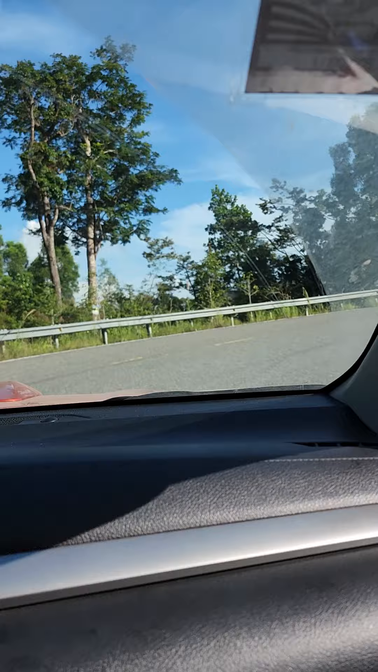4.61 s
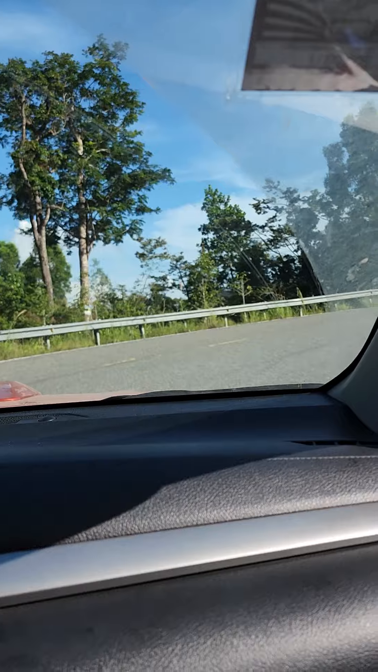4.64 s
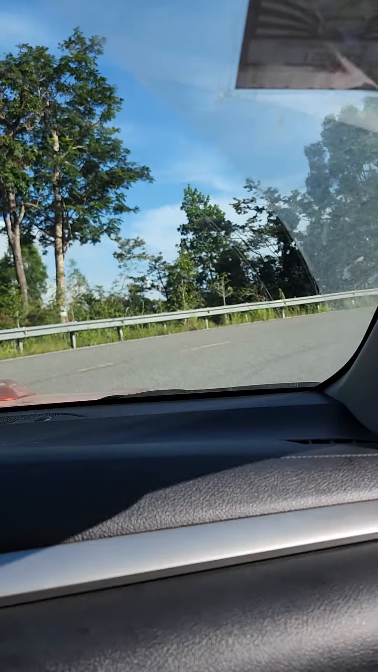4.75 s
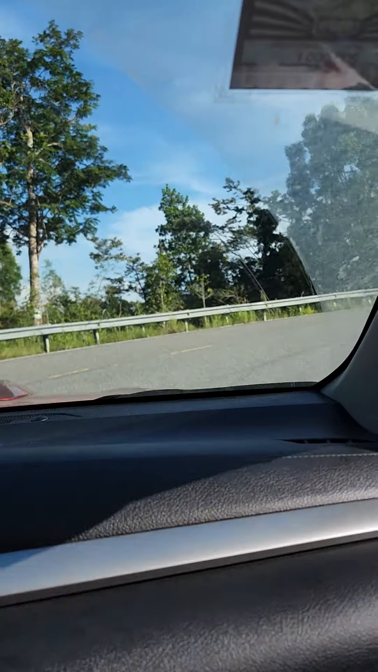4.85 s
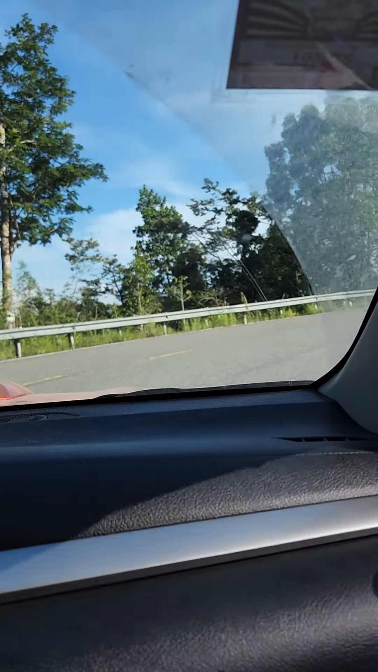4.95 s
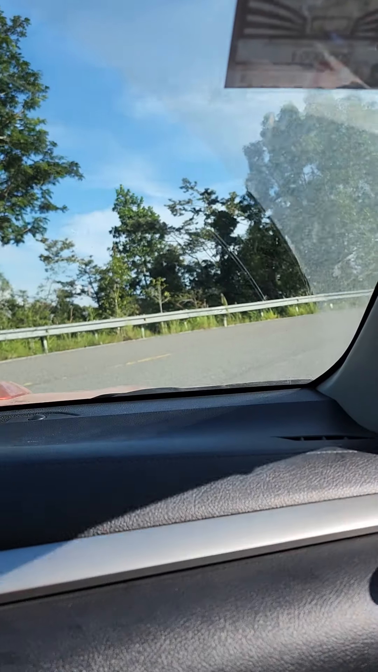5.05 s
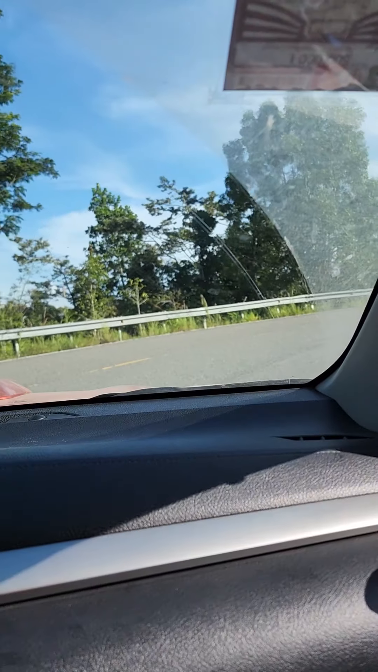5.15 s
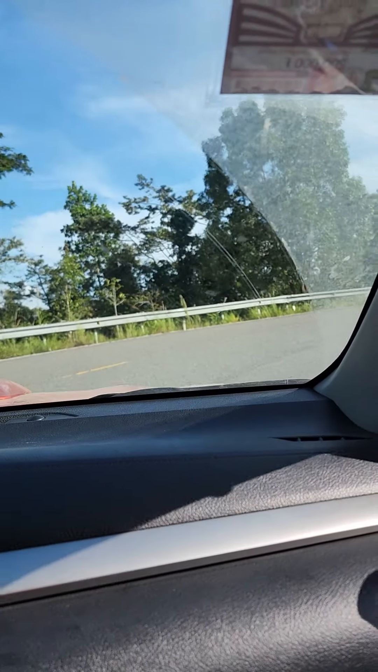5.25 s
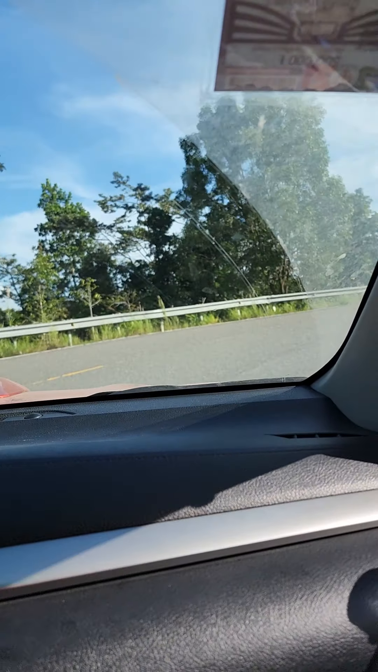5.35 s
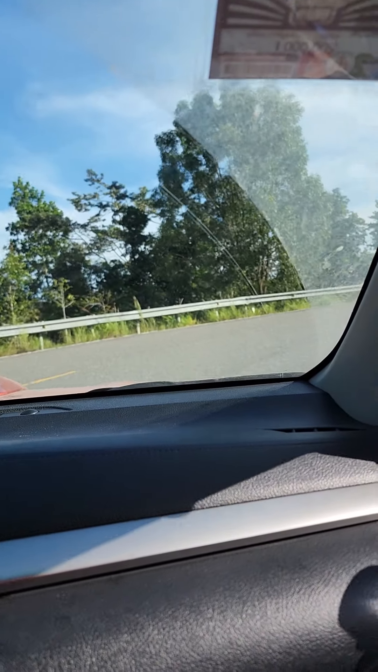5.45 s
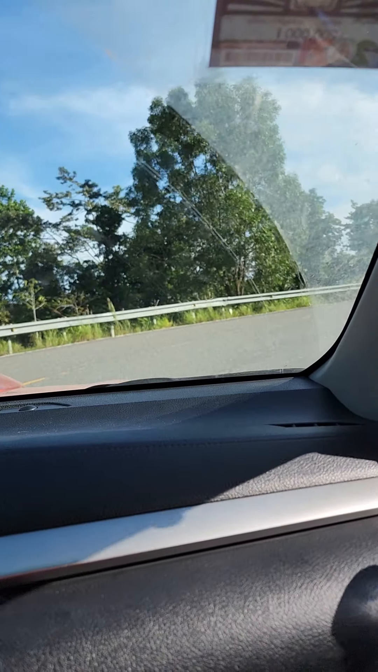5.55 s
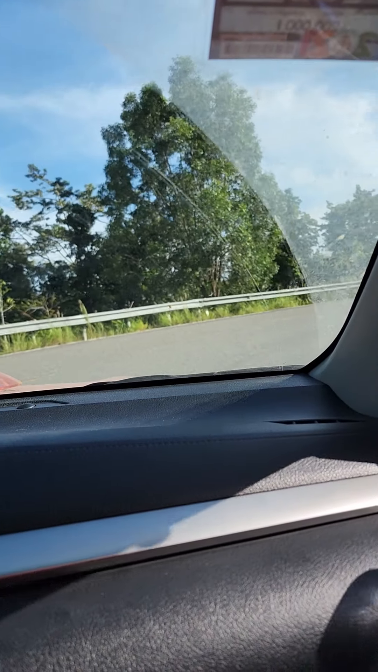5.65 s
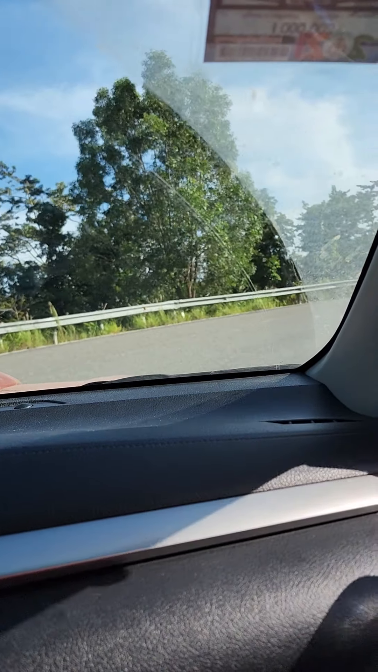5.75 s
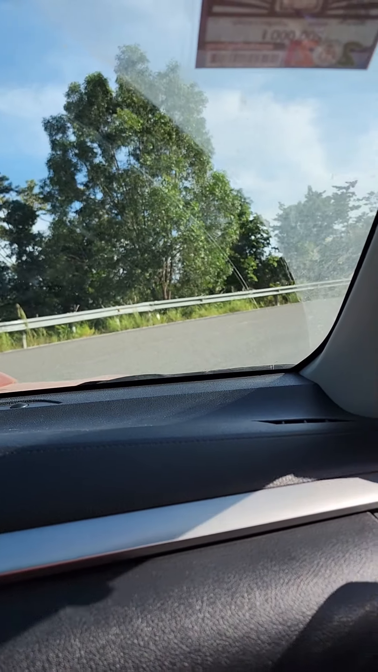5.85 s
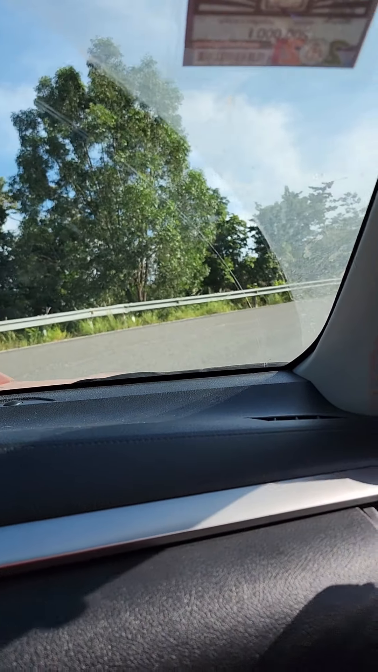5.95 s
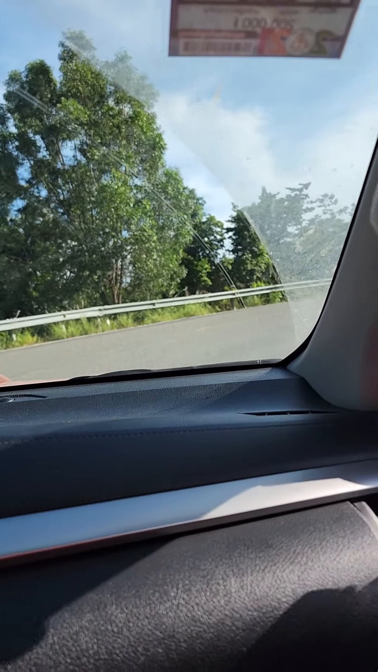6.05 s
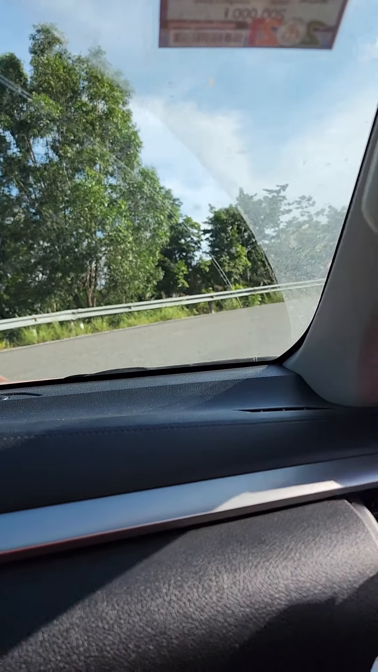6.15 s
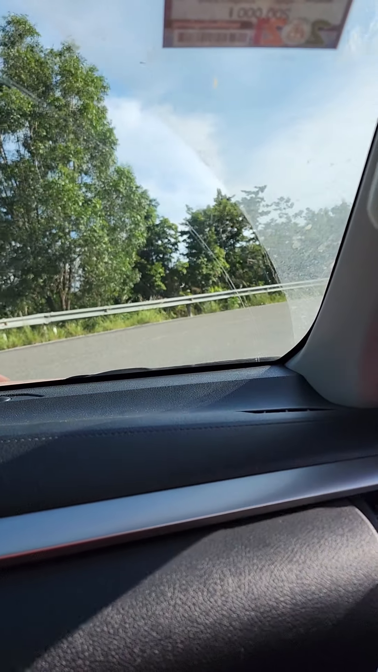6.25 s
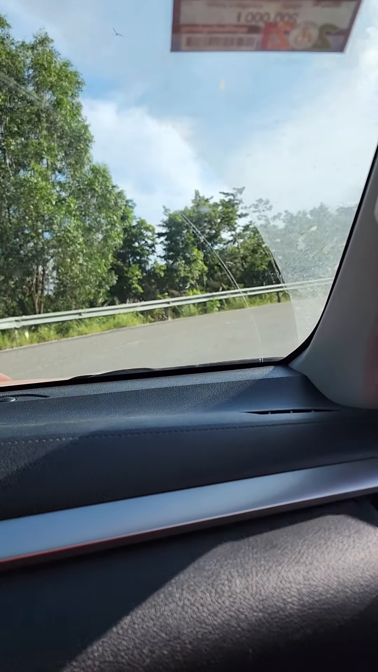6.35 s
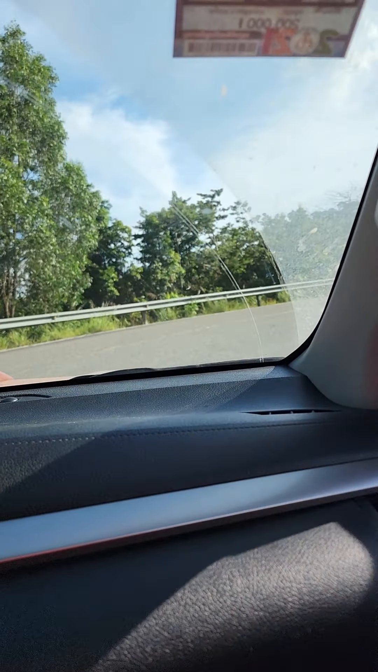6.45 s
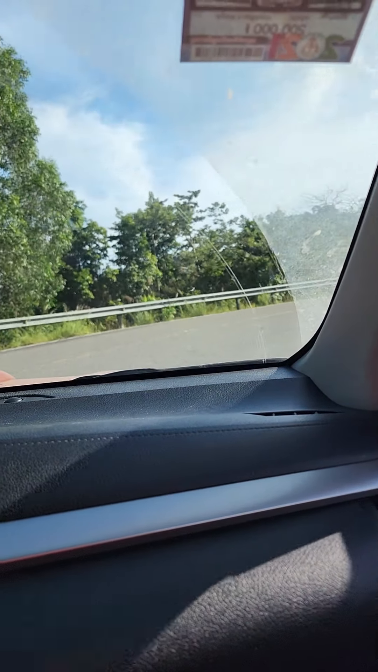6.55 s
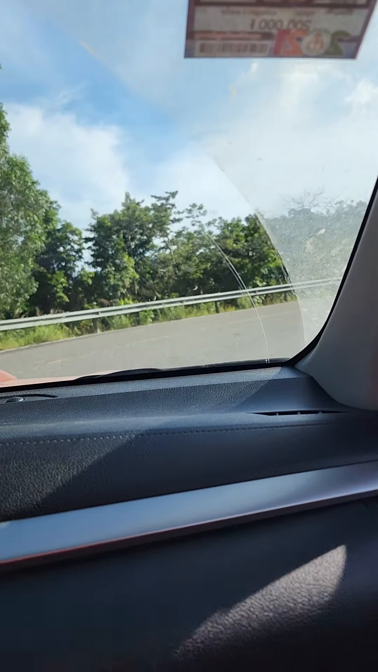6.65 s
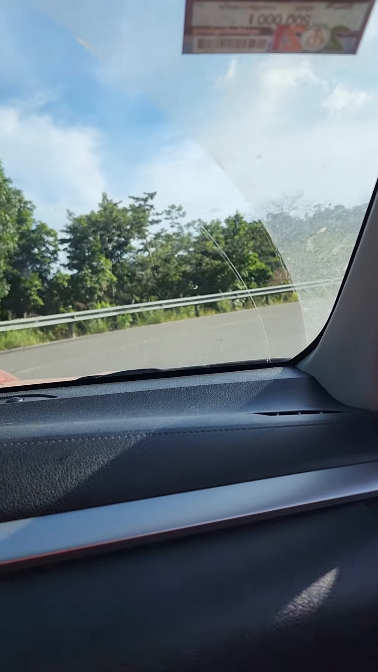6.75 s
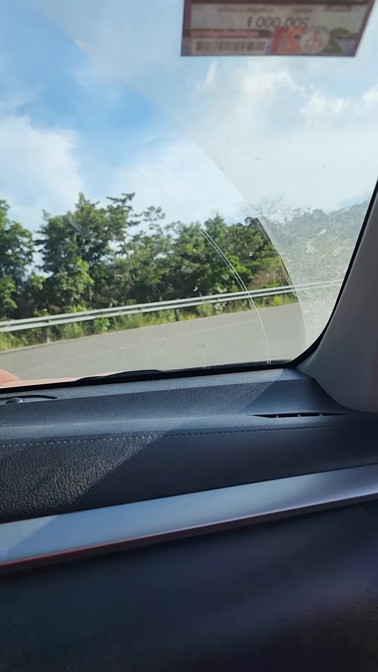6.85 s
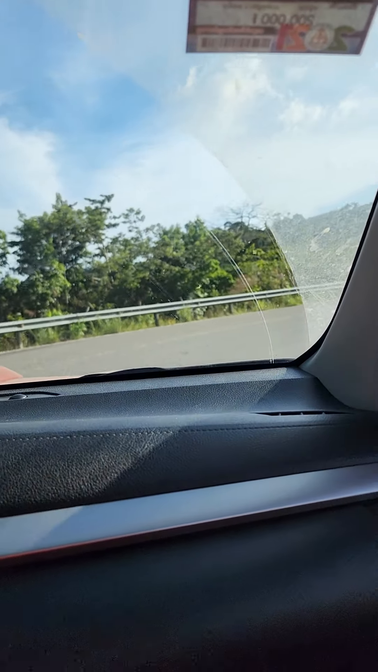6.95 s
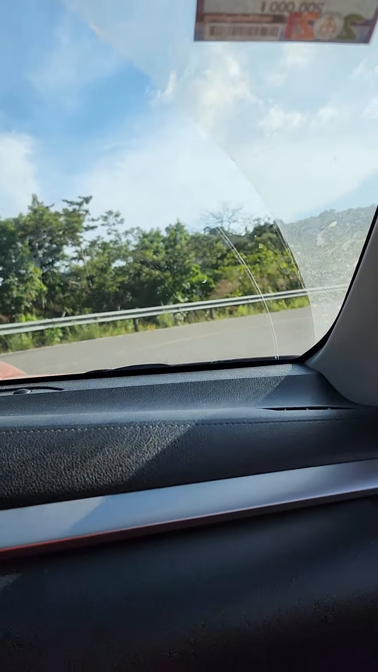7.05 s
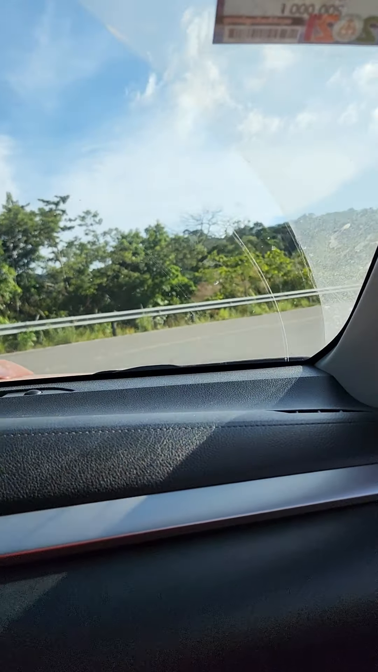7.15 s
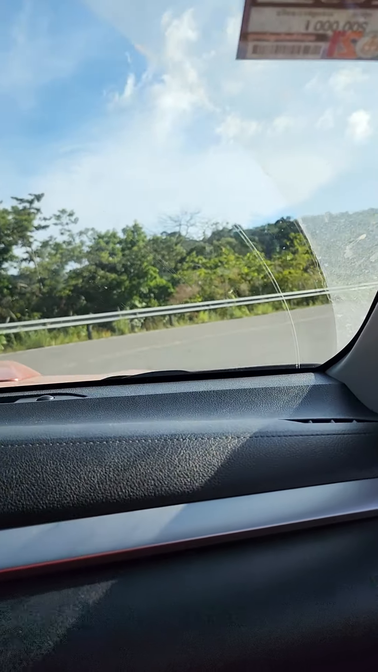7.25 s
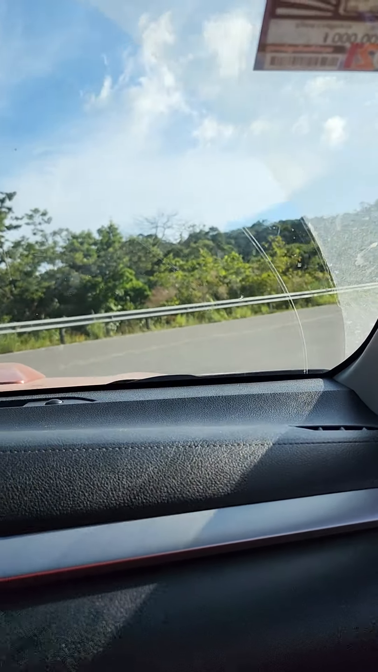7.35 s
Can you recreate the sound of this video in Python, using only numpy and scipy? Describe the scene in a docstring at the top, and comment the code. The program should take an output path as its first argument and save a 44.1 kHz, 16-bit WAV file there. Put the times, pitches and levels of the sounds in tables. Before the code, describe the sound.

Heard from the passenger seat, a diesel car creeps round a bend with a low tyre rumble under a steady rush of air. The tyres moan softly, plastic panels tick now and then, and a run of bumps thumps through the body. Crickets chirp faintly at the roadside. About five seconds in, the car pulls away: the engine booms and rises in pitch, with light clatter and a faint climbing turbo whistle.

```python
"""Tyres rumble and moan under a steady rush of air, heard inside a turbodiesel car.
As it creeps round a mountain bend, bumps thump through the body, plastic panels tick
and crickets chirp with their wings at the roadside. From five seconds on the car pulls away:
the engine's firings boom in the cabin and the turbo whistles up."""
import sys
import numpy as np
from scipy import signal
from scipy.fft import rfft, irfft
from scipy.io import wavfile
from scipy.ndimage import uniform_filter1d

SR = 44100
rng = np.random.default_rng(int(sys.argv[2]) if len(sys.argv) > 2 else 0)


def materialize(psi):
    """Save the field psi as 16-bit PCM at rate SR to the path in sys.argv[1].

    A 1-D psi becomes a single channel; in a 2-D psi each row is a channel.
    """
    bounded = np.clip(np.atleast_2d(psi).T, -1, 1)
    quanta = np.round(bounded * 32767).astype(np.int16)
    wavfile.write(sys.argv[1], SR, quanta)


N = 326420
T = np.arange(N) / SR


def amp(db):
    """Turns decibels into a gain."""
    return 10 ** (np.asarray(db) / 20)


def unit_level(x):
    """Scales a signal to an average power of one."""
    return x / np.sqrt(np.mean(x ** 2) + 1e-20)


def at_pitch(table, hz):
    """Looks up a pitch in a table, blending between rows on a log scale."""
    pitches, values = np.transpose(table)
    return np.interp(np.log(hz + 1), np.log(pitches + 1), values)


def over_time(table):
    """Turns each column after time_s into a curve with one value per sample."""
    times, *columns = np.transpose(table)
    return [np.interp(T, times, column) for column in columns]


def swell(middle_s, length_s, db):
    """A gain that rises and falls in one smooth arch."""
    return amp(db) * np.cos(np.pi * np.clip((T - middle_s) / length_s, -.5, .5))


def wander(hz):
    """A random wobble, no faster than about hz."""
    f = np.fft.rfftfreq(N, 1 / SR)
    return unit_level(irfft(rfft(rng.standard_normal(N)) / (1 + (f / hz) ** 4), N))


def whistle(hz, gain, width_hz, left_db):
    """A fuzzy tone: narrow noise that follows a pitch; left_db leans it to the left."""
    tone = np.exp(2j * np.pi * np.cumsum(hz) / SR)
    pair = np.array([((wander(width_hz) + 1j * wander(width_hz)) * tone).real for _ in range(2)])
    return pair * gain * amp([[left_db], [-left_db]])


# How alike left and right are: pitch_hz, likeness (1 = the same)
STEREO_LIKENESS = [(30, .995), (70, 0.79), (170, 1), (350, 0.75), (700, 0.67), (1400, 0.32), (2800, 0.093),
                   (5000, -0.082), (15000, -0.05)]
# How much louder the left is: pitch_hz, difference_db
STEREO_BALANCE = [(60, -0.5), (140, -0.9), (250, -0.5), (380, 2), (700, 1.5), (1290, -2), (2380, 2.5),
                  (4400, 0), (8120, 2), (15000, 0.5)]
def noise(tone, resonances=()):
    """Stereo noise shaped by a tone table: alike on both sides in the bass, unrelated in the treble."""
    f = np.fft.rfftfreq(N, 1 / SR)
    peaks_db = sum(db * np.exp(-(2 * (f - hz) / width) ** 2) for hz, width, db in resonances)
    likeness = np.clip(at_pitch(STEREO_LIKENESS, f), -1, 1)
    lean_db = at_pitch(STEREO_BALANCE, f) / 2
    mid, side = rfft(rng.standard_normal((2, N))) * np.sqrt([1 + likeness, 1 - likeness])
    spectra = np.array([(mid + side) * amp(lean_db), (mid - side) * amp(-lean_db)])
    pair = irfft(spectra * amp(at_pitch(tone, f) + peaks_db), N)
    return pair / np.std(pair.mean(0))


def restless(x, depth_db, bands):
    """Lets narrow bands of a noise swell and sink on their own, a few times a second."""
    spectra = signal.stft(x, nperseg=2048, noverlap=1536)[2]
    patches = rng.standard_normal(spectra.shape[1:])
    for _ in range(2):
        patches = uniform_filter1d(patches, size=bands, axis=0)  # smooth across pitch
        patches = uniform_filter1d(patches, size=14, axis=1)  # and across time
    gain = unit_level(amp(depth_db * unit_level(patches)))
    return signal.istft(spectra * gain, nperseg=2048, noverlap=1536)[1][:, :N]


# How the rush and the hiss rise and fall: time_s, level_db
RUSH_LEVEL = [(0, -42.5), (.5, -40), (1.4, -40.5), (3.3, -43.5), (4.6, -45.5), (7.4, -43)]
HISS_LEVEL = [(0, -56.5), (1.1, -58), (2.3, -60.5), (3.4, -61.5), (4.9, -62), (5.1, -58), (6.9, -57),
              (7.4, -54.5)]
# Their tone colours: pitch_hz, gain_db
RUSH_TONE = [(20, -29), (130, -13), (195, 10), (255, -4), (400, 0), (510, -2.5), (590, -5), (740, -1),
             (1020, -5.5), (1300, -6), (1600, -11), (2000, -19), (3000, -27), (12000, -69.5)]
HISS_TONE = [(500, -9), (1060, -7), (1800, -2), (2430, -9), (3160, -12), (3800, -12.5), (5360, -13),
             (6000, -16), (7780, -17), (9330, -22.5), (10400, -27.5), (11100, -30.5), (14600, -31.5),
             (15800, -33.5)]
# Narrow resonances of the ducts and trim: pitch_hz, width_hz, gain_db
DUCT_RESONANCES = [(420, 20, 0.5), (570, 32, -6), (707, 86, 3.5), (877, 27, 2), (984, 70, -1.5),
                   (1183, 43, 1), (1311, 55, 3.5), (1330, 39, -1), (1530, 54, 1), (1860, 160, -1.5),
                   (2170, 63, 3), (3110, 200, 2.5)]
def air(rush_boost_db=3.5, hiss_boost_db=4):
    """The fan and the air rush, and the engine bay hisses."""
    rush = restless(noise(RUSH_TONE, DUCT_RESONANCES), depth_db=1.5, bands=3)
    hiss = restless(noise(HISS_TONE, DUCT_RESONANCES), depth_db=1.05, bands=10)
    rush *= amp(over_time(RUSH_LEVEL)[0] + rush_boost_db)
    hiss *= amp(over_time(HISS_LEVEL)[0] + hiss_boost_db)
    return rush + hiss


def insect(pitch_hz=10350, drift_hz=90, flicker_db=3):
    """A thin insect buzz in the grass comes and goes as the car drives past."""
    gain = swell(middle_s=4.4, length_s=3.9, db=-81) * unit_level(amp(flicker_db * wander(3)))
    return whistle(pitch_hz + drift_hz * wander(2), gain, width_hz=220, left_db=1)


def wing_stroke(hz, blur, length_s=.045, droop=0.06, rasp=0.0046, blur_hz=200):
    """A tone that sags as the wing slows; blur breaks it into a fuzzy flutter."""
    progress = np.arange(0, length_s, 1 / SR) / length_s
    lowpass = signal.butter(2, blur_hz, fs=SR, output="sos")
    wobbles = unit_level(signal.sosfilt(lowpass, rng.standard_normal((3, SR // 4))))
    pitch_wobble, fuzz_real, fuzz_imag = wobbles[:, -len(progress):]
    pitch = hz * (1 - droop * progress ** 4 + rasp * pitch_wobble)
    flutter = np.sqrt(1 - blur) + np.sqrt(blur / 2) * (fuzz_real + 1j * fuzz_imag)
    return np.sin(np.pi * progress) * (flutter * np.exp(2j * np.pi * np.cumsum(pitch) / SR)).real


# Cricket chirps: start_s, pitch_hz, level_db, blur (0 to 1), stroke_count
CHIRPS = [(2.727, 7100, -65, .4, 2), (2.964, 7000, -55.5, .05, 2), (3.18, 7440, -65, .2, 2),
          (3.203, 7000, -62, .15, 2), (3.415, 7440, -64, .1, 2), (3.443, 6960, -57.5, .15, 2),
          (3.655, 7360, -63, .2, 2), (3.679, 6930, -55, .1, 2), (3.895, 7420, -66, .6, 2),
          (3.92, 6990, -59, .2, 2), (4.156, 6980, -59, .1, 2), (4.39, 6960, -62, .3, 2),
          (4.576, 6900, -64.5, .4, 3), (4.812, 6930, -66, .5, 3), (5.056, 6920, -67, .7, 2),
          (5.316, 8060, -66, .2, 2)]
def crickets(gain_db=-0.3, spacing_s=0.051, uneven_db=2.0, echo_db=-8, echo_s=.12):
    """Each chirp is a few wing strokes, no two alike, scattered a little by the cabin."""
    chirps = np.zeros(N)
    for start_s, hz, db, blur, strokes in CHIRPS:
        for stroke_s in start_s + spacing_s * np.arange(round(strokes)):
            wing, start = wing_stroke(hz, blur), round(stroke_s * SR)
            chirps[start:start + len(wing)] += amp(gain_db + db + uneven_db * rng.standard_normal()) * wing
    t = T[:SR // 8]
    echo = rng.standard_normal((2, len(t))) * amp(-60 * t / echo_s)
    echo /= np.linalg.norm(echo, axis=1, keepdims=True)
    return chirps + amp(echo_db) * signal.fftconvolve(chirps[None], echo, axes=1)[:, :N]


# One rustle: middle_s, length_s, level_db
RUSTLE = (1.35, .08, -59)
# Its tone colour: pitch_hz, gain_db
RUSTLE_TONE = [(1000, -25), (2300, -8), (3050, 2), (3900, -12), (9000, -30)]
def rustle():
    """A brief, soft rustle in the cabin."""
    return swell(*RUSTLE) * noise(RUSTLE_TONE)


# Ticks of the panels: start_s, level_db, pitch_hz
PANEL_TICKS = [(.36, -46, 3200), (1.113, -36, 2400), (2.648, -43, 2300), (2.949, -51, 2200),
               (5.862, -45, 3300), (5.887, -42, 3380), (6.342, -41, 3200), (7.056, -42, 3480)]
def panels(gain_db=-6, crack_s=.03, rattle_s=.12, rattle_db=-13, rise_s=0.0004):
    """Plastic panels tick as the body flexes: a short crack, then a weak rattle."""
    out = np.zeros((2, N))
    for start_s, db, hz in PANEL_TICKS:
        panel = signal.iirpeak(hz, Q=1.0, fs=SR)
        ring = signal.lfilter(*panel, rng.standard_normal((2, N)))
        ring = unit_level(signal.lfilter(*panel, ring))
        age = np.maximum(T - start_s, 0)
        fall = amp(-60 * age / crack_s) + amp(rattle_db - 60 * age / rattle_s)
        out += ring * (1 - np.exp(-age / rise_s)) * fall * amp(db + gain_db)
    return out


# Tyre moans as the car slows into the bend: middle_s, length_s, pitch_hz, level_db
MOANS = [(.35, .5, 824, -51), (.6, 1.1, 1200, -52.5), (.8, 1.1, 712, -52)]
# Hollow roar of the scrubbing tread: time_s, level_db
SCRUB_LEVEL = [(0, -73), (1.5, -55), (2.8, -47.5), (4, -48.5), (4.7, -50.5), (5.4, -55.5), (7.4, -71)]
# Its tone colour: pitch_hz, gain_db
SCRUB_TONE = [(300, -26.5), (460, -15), (570, -9.5), (705, 4.5), (790, 1), (890, -0.5), (990, -15),
              (1300, -14), (1600, -27), (4000, -61)]
def tread():
    """The tread scrubs and moans on the asphalt while the car turns."""
    moans = sum(whistle(np.full(N, hz), swell(middle_s, length_s, db), width_hz=24, left_db=-3.5)
                for middle_s, length_s, hz, db in MOANS)
    return moans + amp(over_time(SCRUB_LEVEL)[0]) * noise(SCRUB_TONE)


# Steady drumming of the tyres: time_s, level_db
DRUM_LEVEL = [(0, -36), (.6, -41.5), (1.15, -39), (1.4, -30.5), (2.3, -33.5), (2.38, -43), (2.68, -35.5),
              (2.76, -31), (4.7, -31), (5.9, -29.5), (7.4, -26)]
# Tone colours of the drumming and of the shaking body: pitch_hz, gain_db
DRUM_TONE = [(15, -52), (35, -19), (60, 0), (75, 2), (100, -1), (125, 0.5), (155, -2.5), (178, -5.5),
             (202, -3.5), (232, -9.5), (300, -14.5), (420, -19), (520, -18.5), (600, -26), (4000, -100)]
SHAKE_TONE = [(10, -34), (22, -12.5), (33, -5.5), (43, -7), (52, 1), (62, -7), (80, -20), (130, -50),
              (400, -110)]
# Air ringing inside the tyres: pitch_hz, width_hz, gain_db
TYRE_RESONANCE = [(201.7, 12, 4)]
# Rough patches of road: middle_s, length_s, drum_db, shake_db
ROUGH_PATCHES = [(1.492, 0.17, -34, -35), (1.806, 0.61, -35.5, -29), (2.012, 0.079, -32, -34),
                 (2.217, 0.29, -30.5, -38), (2.53, 0.23, -32, -40), (2.802, 0.18, -38, -29),
                 (3.04, 0.4, -34.5, -26.5), (3.304, 0.27, -30.5, -29.5), (3.465, 0.18, -32, -26),
                 (3.83, 0.34, -31.5, -41), (4.25, 0.47, -45, -34), (4.553, 0.32, -43, -32)]
def tyres(steady_shake_db=-38, shake_boost_db=0.4):
    """Road grain drums through the tyres and shakes the body; each rough patch adds to both."""
    drum_gain, shake_gain = amp(over_time(DRUM_LEVEL)[0]), amp(steady_shake_db)
    for middle_s, length_s, drum_db, shake_db in ROUGH_PATCHES:
        drum_gain = np.hypot(drum_gain, swell(middle_s, length_s, drum_db))
        shake_gain = np.hypot(shake_gain, swell(middle_s, length_s, shake_db))
    drumming = drum_gain * noise(DRUM_TONE, TYRE_RESONANCE)
    return drumming + amp(shake_boost_db) * shake_gain * noise(SHAKE_TONE)


# Suspension thumps and sharper tyre knocks on broken asphalt: start_s, level_db, pitch_hz
THUMPS = [(.107, -23.5, 42), (1.01, -26, 48.5), (1.425, -20.5, 54), (1.625, -19, 52), (1.863, -22, 50),
          (2.014, -25.5, 54.5), (2.152, -19.5, 56), (2.266, -20, 54.3), (2.737, -24, 60), (2.828, -19, 56),
          (3.058, -21, 54.7), (3.137, -21, 52), (3.337, -22.5, 55), (3.445, -15, 51.3), (3.643, -25, 50.5),
          (3.757, -20, 56.4), (3.983, -21, 53), (4.198, -22, 56), (4.357, -22, 59.4), (4.473, -24, 56),
          (4.82, -15.5, 46.7)]
KNOCKS = [(2.028, -28, 132), (3.108, -23, 151), (3.291, -24.5, 122), (3.411, -19, 124), (3.619, -24.5, 129),
          (3.779, -24.5, 166), (3.866, -17.5, 117), (3.931, -18.5, 151), (4.1, -21, 126), (4.155, -24, 166),
          (4.304, -20, 140), (4.361, -20.5, 115), (4.778, -19.5, 148), (4.955, -19, 127)]
def jolts(hits, rise_s):
    """A wheel drops over a seam or strikes an edge: the body rings for a few cycles."""
    out, t = np.zeros(N), T[:SR // 4]
    envelope = (t / rise_s * np.exp(1 - t / rise_s)) ** 2
    for start_s, db, hz in hits:
        start = round(start_s * SR)
        out[start:start + len(t)] += amp(db) * envelope * np.sin(2 * np.pi * hz * t)
    return out


# Spells of high singing: middle_s, length_s, level_db
SINGING = [(2.58, 0.55, -85), (3.62, .55, -84), (4.55, .9, -85)]
# The thin whine: time_s, pitch_hz, level_db
WHINE = [(5.8, 6050, -99), (6.6, 6350, -76), (7.1, 6240, -77), (7.4, 6200, -73)]
def whines(singing_hz=5200, sag_hz_per_s=65):
    """Faint singing comes and goes at a crawl; a thin whine joins as the engine works hard."""
    spells = sum(swell(*row) for row in SINGING)
    singing = whistle(singing_hz - sag_hz_per_s * T, spells, width_hz=80, left_db=13)
    hz, db = over_time(WHINE)
    return singing + whistle(hz, amp(db) * (T > WHINE[0][0]), width_hz=80, left_db=10.5)


# How fast the engine fires: time_s, firing_hz
ENGINE_SPEED = [(0, 26.5), (4.87, 26.9), (5.0, 32.6), (5.1, 37.6), (5.19, 38.4), (5.28, 40.7), (5.53, 42.9),
                (5.64, 43), (5.8, 45.2), (6.04, 49.3), (6.18, 49.6), (6.42, 52), (6.85, 53.5), (7.18, 57.5),
                (7.4, 57.8)]
# How hard it works: time_s, load_db
ENGINE_LOAD = [(0, -47), (1.2, -32.5), (2.7, -28.5), (4.75, -27.5), (5.0, -7), (5.3, -1.5), (6.1, -0.5),
               (7.4, -1.05)]
def engine_effort(growth_db):
    """A gain that follows the load and grows by growth_db for a tenfold rise in engine speed."""
    firing_hz, load_db = over_time(ENGINE_SPEED)[0], over_time(ENGINE_LOAD)[0]
    return amp(load_db + growth_db * np.log10(firing_hz / firing_hz.max()))


# One gulp of air before pulling away: middle_s, length_s, level_db
GULP = (4.1, .48, -72)
# Tone colours of the intake air and the gulp: pitch_hz, gain_db
INTAKE_TONE = [(1000, -71), (4000, -28), (6400, 2), (7700, 3.5), (9000, -2), (10300, -11), (11000, -12.5),
               (12800, -9), (14300, -2.5), (15700, -8.5)]
GULP_TONE = [(2000, -25), (4500, 4), (8000, 7), (11000, 0), (14500, 0), (15800, -10)]
def intake(start_db=-59, fade_db_per_s=10.5, pulling_db=-66.5):
    """Intake air fades as the turbo runs down, gulps once, then grows with load and engine speed."""
    coasting = amp(start_db - fade_db_per_s * T)
    pulling = amp(pulling_db) * engine_effort(growth_db=31.5)
    return np.hypot(coasting, pulling) * noise(INTAKE_TONE) + swell(*GULP) * noise(GULP_TONE)


# How loud the turbo is in the cabin at each pitch: pitch_hz, level_db
TURBO_IN_CABIN = [(4400, -94), (5300, -70), (6200, -72), (7700, -82), (9300, -73), (10400, -87),
                  (11500, -80), (13300, -76.5), (14600, -70), (15900, -70)]
def turbo(start_s=4.9, start_hz=4400, rise_hz_per_s=4650):
    """The turbo spins up: its whistle climbs steadily and frays into hiss."""
    hz = start_hz + rise_hz_per_s * np.maximum(T - start_s, 0)
    gain = amp(at_pitch(TURBO_IN_CABIN, hz)) * (T > start_s)
    frayed = (hz - start_hz) / (hz.max() - start_hz)
    core = whistle(hz, gain * np.sqrt(1 - frayed), width_hz=340, left_db=7.5)
    return core + whistle(hz, gain * np.sqrt(frayed), width_hz=850, left_db=9.5)


# Tone colour of the diesel clatter: pitch_hz, gain_db
CLATTER_TONE = [(60, -33), (200, -3.5), (285, 10.5), (340, -2), (450, 0), (600, 2), (1000, -22), (1600, -6),
                (2200, -15.5), (3200, -20.5), (5000, -29.5), (12000, -56)]
def clatter(firings, level_db=-42, throb=0.29):
    """Burning fuel makes a puff of noise at each firing, louder with load and engine speed."""
    puffs = 1 + throb * np.cos(2 * np.pi * firings)
    return amp(level_db) * engine_effort(growth_db=40) * puffs * noise(CLATTER_TONE, DUCT_RESONANCES)


# Strength of the engine's harmonics: multiple_of_firing_rate, gain_db
HARMONICS = [(1, 0), (2, 4), (3, .5), (4, .5), (5, -12), (6, -16), (9, -19)]
# How well the cabin carries each pitch: pitch_hz, gain_db
CABIN_RESPONSE = [(27, -21), (38, -18), (47, -10.2), (52, -11.1), (58, -17), (68, -26.5), (88, -32),
                  (96, -38), (103, -32), (113, -30), (128, -25.5), (137, -28), (147, -42), (157, -36),
                  (172, -43), (188, -34), (204, -29.5), (222, -30.5), (238, -39), (258, -29.5), (285, -37),
                  (600, -56)]
def engine(jitter=0.0017, wobble_db=1.5, boom_wobble_db=0.5, between_db=-15):
    """Firing harmonics sweep through the cabin's resonances; returns the sound and a firing count."""
    firing_hz, load_db = over_time(ENGINE_SPEED)[0], over_time(ENGINE_LOAD)[0]
    firings = np.cumsum(firing_hz * (1 + jitter * wander(7.4))) / SR
    out = np.zeros(N)
    for multiple in np.arange(2, 19) / 2:
        db = at_pitch(HARMONICS, multiple) + at_pitch(CABIN_RESPONSE, multiple * firing_hz)
        if multiple % 1:  # unequal cylinders leave weak tones between the harmonics
            db += between_db
        db += (boom_wobble_db if multiple == 1 else wobble_db) * wander(7.3)
        out += amp(db + load_db) * np.cos(2 * np.pi * (multiple * firings + rng.random()))
    return np.sqrt(2) * out * amp([[-.15], [.15]]), firings


def scene():
    """Everything as heard from the passenger seat."""
    boom, firings = engine()
    cabin = panels() + rustle()
    diesel = boom + clatter(firings)
    road = tyres() + tread() + jolts(THUMPS, rise_s=.017) + jolts(KNOCKS, rise_s=0.0069)
    return cabin + diesel + road + air() + intake() + turbo() + whines() + crickets() + insect()


def record(dry, cutoff_hz=15800, fade_s=.004):
    """Softens the start and the end, and cuts the highest treble."""
    fade = np.sin(np.pi / 2 * np.clip(np.minimum(T, T[-1] - T) / fade_s, 0, 1)) ** 2
    lowpass = signal.firwin(511, cutoff_hz, window=("kaiser", 9), fs=SR)
    return signal.oaconvolve(dry * fade, lowpass[None], "same")


dry = scene()
out = record(dry)
materialize(out)
```